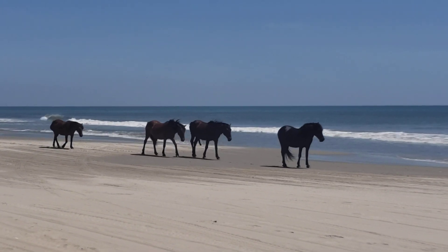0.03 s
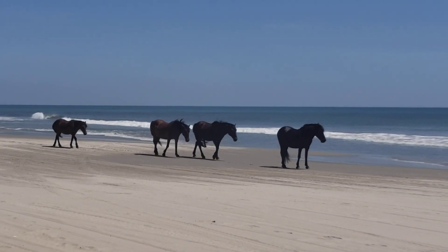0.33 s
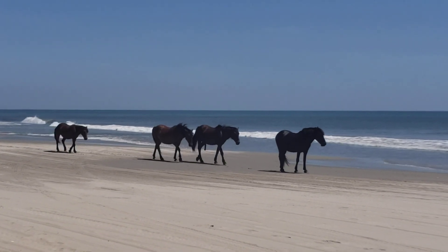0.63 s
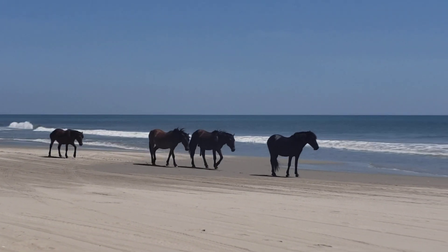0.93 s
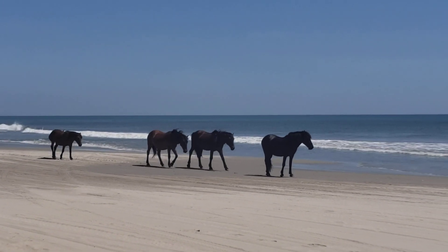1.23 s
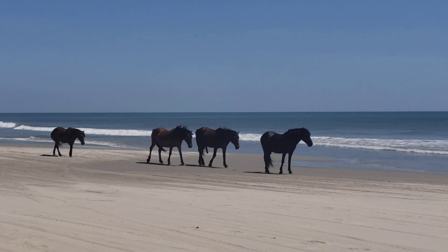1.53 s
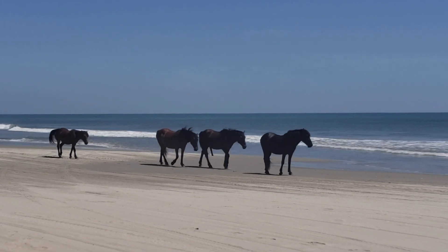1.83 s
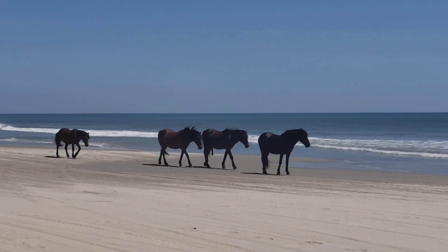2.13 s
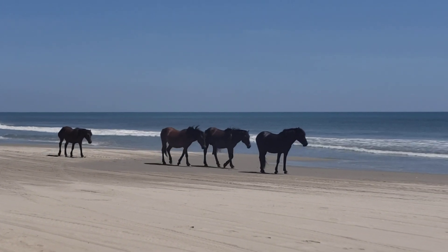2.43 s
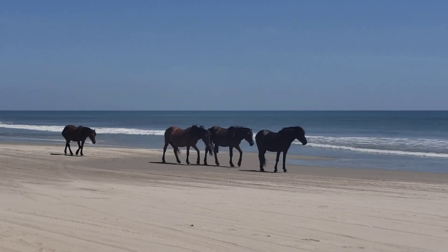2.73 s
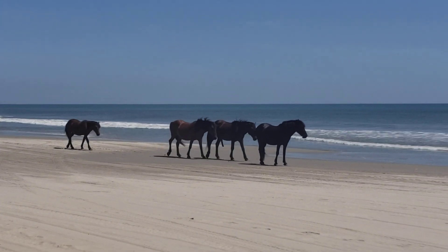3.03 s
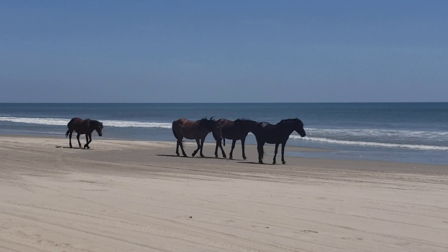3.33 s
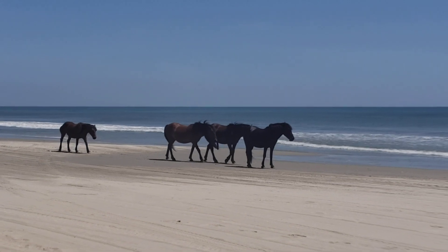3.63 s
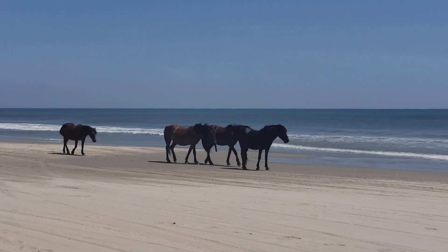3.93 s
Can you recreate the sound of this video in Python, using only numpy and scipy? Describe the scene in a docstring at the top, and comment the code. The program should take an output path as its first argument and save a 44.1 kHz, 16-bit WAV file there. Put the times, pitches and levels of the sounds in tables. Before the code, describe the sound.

Wind buffets the microphone on an open beach. For the first half second a strong gust booms on the right and hisses on the left. It then drops to quick, irregular low thumps that continue until the end at 4 seconds. Surf washes behind throughout, swelling slightly after 3 seconds. Faint sand ticks come near 2.2 and 3.5 seconds, and a faint bright hiss rises on the left late.

```python
"""A strong gust batters the right of two small microphone ports and hisses across the left.
Behind it is the surf of an open beach: breakers wash in from the right, swell slowly and fizz with foam.
The gust drops away after half a second, but eddies keep thumping on the ports in quick flurries.
Later, sand ticks faintly on the case, and a brighter hiss rises on the left near the end."""
import sys
import numpy as np
from scipy import signal
from scipy.fft import rfft, irfft
from scipy.io import wavfile
from scipy.ndimage import uniform_filter1d

SR = 44100
rng = np.random.default_rng(int(sys.argv[2]) if len(sys.argv) > 2 else 0)


def generate_wav(signal):
    """Clip the signal to [-1, 1] and save it as 16-bit WAV at the path in sys.argv[1]."""
    frames = np.transpose(np.atleast_2d(signal))
    scaled = np.clip(frames, -1, 1) * 32767
    pcm = np.round(scaled).astype(np.int16)
    wavfile.write(sys.argv[1], SR, pcm)


N = 176400
TIME, FREQS = np.arange(N) / SR, np.fft.rfftfreq(N, 1 / SR)

# The wind's fader ride. Each row: time in seconds, level in dB before each port's own gain.
WIND_RIDE = [(0.0, -36), (0.04, -33.5), (0.5, -29.5), (0.6, -33), (0.75, -34.5), (1.0, -41), (1.14, -34),
             (1.19, -35.5), (1.23, -34), (1.33, -41), (1.74, -41), (1.79, -33), (1.85, -37), (1.98, -43),
             (2.1, -36.5), (2.19, -35.5), (2.28, -40), (2.5, -41), (2.55, -42.5), (2.8, -37), (3.0, -38.5),
             (3.15, -42), (3.36, -37), (3.57, -40), (3.65, -34.5), (3.75, -32), (3.89, -42), (3.94, -37),
             (4.0, -30.5)]
# Four wind tone curves. Each row: frequency in Hz, relative level in dB.
EDDY_EQ = [(15, -30.5), (30, -13.5), (48, -4.5), (66, 2.5), (110, -7.5), (180, -7), (280, -13.5),
           (450, -26), (900, -39.5), (3000, -76)]  # the pressure kick of an eddy
RASP_EQ = [(500, -9), (1100, -4.5), (1750, 1), (2400, -1), (3300, -3.5), (4000, -8.5), (4800, -21),
           (6200, -17), (8500, -36), (12000, -67)]  # air rushing across the left port
BOOM_EQ = [(25, -25), (50, -7.5), (73, 2.5), (105, -3.5), (200, -31), (800, -80)]  # deep buffeting of the right port
FLUTTER_EQ = [(60, -16.5), (130, 0.5), (310, -0.5), (450, -11), (1000, -26), (3000, -60)]  # the small eddies that a large one sheds
# Lulls between gusts. Each row: centre in seconds, spread in seconds, dip of the wind in dB.
WIND_LULLS = [(0.586, 0.015, -3.5), (1.06, 0.011, -3), (1.548, .025, -4), (1.89, 0.036, -6),
              (2.078, 0.02, -6.5), (3.428, .018, -5.5), (3.796, 0.03, -7)]
# The swell of the breakers. Each row: time in seconds, then roar, wash and foam gains in dB.
SURF_SWELL = [(0, -1, 1, 2.5), (.6, -2.6, -1, 0), (.82, -1.5, -1.1, 0), (.97, -1.5, 0, 1.3),
              (1.12, -4.5, -1.8, 0.5), (1.35, 0, -1.4, 1), (1.6, -1, -2.5, -1), (1.8, 0, -1, -0.1),
              (2.0, -2, -3, -0.9), (2.2, 0, -1.2, -0.9), (2.38, 3, -1, -0.9), (2.6, -1.3, 0, -1),
              (2.8, 1.5, 0.1, -0.5), (3.02, 0.5, -0.5, 0), (3.15, .8, 1.5, 0.5), (3.35, 1.9, 1.5, 1.5),
              (3.48, 3, 3, 3), (3.58, 0.5, -0.5, 1.5), (3.7, 0.5, 1.8, 3.5), (3.87, 3, 1, 2.5),
              (4.0, 1.5, 1.5, 3)]
# The surf's tone at the ports. Each row: frequency in Hz, left and right base levels in dB per Hz.
SURF_EQ = [(29.8, -112, -113), (119, -62, -63), (208, -67.5, -70.5), (300, -69.5, -65.5),
           (446, -69.5, -70.5), (576, -74, -74.5), (793, -73, -74.5), (972, -79, -81), (1336, -74.5, -76),
           (1970, -80, -82.5), (2260, -78.5, -79.5), (2900, -82, -83), (3450, -86, -89.5),
           (3950, -90.5, -92), (5100, -94, -93), (6100, -94.5, -95.5), (7350, -98.5, -99),
           (8280, -104, -105), (11100, -107, -104), (11900, -119, -102), (14500, -120, -102),
           (14600, -120, -112)]
# How the sea reaches the ports. Each row: frequency in Hz, right lead in radians, likeness from 0 to 1.
SURF_STEREO = [(98, 0.15, 1), (467, 0.31, 0.29), (813, 0.97, 0.71), (1300, 2.9, 0.62), (1810, 4.15, 0.72),
               (2470, 6.7, 0.22), (3360, 9, 0.32), (4000, 12.3, 0.96), (4180, 11, 0.2), (5750, 17, 0.4),
               (7240, 19.2, 0.1), (14000, 29, 0.06)]
# The drift of the surf's tone. Each row: frequency in Hz, late level minus early level in dB.
SURF_DRIFT = [(450, -0.5), (570, 2.5), (730, -0.5), (930, 2.5), (1250, 0), (1700, 0), (2400, 0.7),
              (3350, -0.3), (4000, 0.5), (4900, -2.5), (5700, -1), (6500, 2.5), (8200, 0.5), (10500, 2),
              (14000, 1)]
# Large eddies. Each row: centre in seconds, left and right base levels in dB, pitch in Hz before sag.
LARGE_EDDIES = [(0.051, -37, -28, 100), (0.099, -27, -24, 74), (0.177, -35, -20.5, 107),
                (0.22, -22, -16, 80), (0.281, -25.5, -22, 85), (0.315, -37, -19, 114), (0.37, -29, -22, 80),
                (0.413, -23.5, -17, 287), (0.46, -20.5, -16, 117), (0.508, -22.5, -20.5, 110),
                (0.613, -21, -28, 83), (0.663, -31, -19, 136), (0.716, -27, -21, 85),
                (0.777, -20.5, -23.5, 97), (0.809, -30, -32, 118), (0.845, -23, -20.5, 91),
                (0.911, -26, -25.5, 89), (0.966, -27, -26, 114), (0.993, -26.5, -32, 132),
                (1.031, -25.5, -24, 110), (1.097, -23, -21, 127), (1.141, -22.5, -23, 84),
                (1.226, -22, -24, 92), (1.271, -24, -27.5, 132), (1.318, -26, -32, 113),
                (1.465, -26, -24, 288), (1.502, -24, -26.5, 101), (1.685, -22, -22.5, 143),
                (1.786, -22.5, -18.5, 77), (1.808, -28, -24.5, 75), (1.838, -26.5, -22, 124),
                (1.942, -26.5, -27, 125), (1.974, -25, -28, 150), (1.992, -25, -30, 94),
                (2.163, -32, -24, 123), (2.19, -26, -25, 90), (2.21, -23, -24.5, 98), (2.25, -37, -25, 106),
                (2.34, -24, -29, 137), (2.371, -25, -22, 193), (2.447, -22.5, -24.5, 108),
                (2.491, -23.5, -24, 86), (2.626, -22, -27, 192), (2.669, -26, -39, 140),
                (2.739, -23, -25.5, 113), (2.801, -21, -19, 108), (2.868, -27.5, -34, 88),
                (2.936, -23.5, -24.5, 99), (2.982, -23, -24.5, 106), (3.018, -23.5, -24.5, 95),
                (3.068, -21, -27, 132), (3.149, -26.5, -25, 138), (3.218, -24.5, -28.5, 110),
                (3.281, -20.5, -22, 129), (3.342, -20.5, -22, 103), (3.372, -21.5, -22, 113),
                (3.499, -23, -22, 122), (3.627, -24, -20.5, 96), (3.663, -29, -21, 88),
                (3.726, -34, -28, 107), (3.884, -20.5, -30, 156), (3.99, -20.5, -20.5, 154)]
# Air whistling over the ports. Each row: centre and spread in seconds, pitch and half-width in Hz,
# left and right levels in dB.
PORT_WHISTLES = [(.1, .025, 14300, 1500, -85, -61), (.26, .022, 1740, 50, -44, -60),
                 (.25, .018, 2570, 70, -45, -60)]
# Sand hitting the case. Each row: start in seconds, left and right gains in dB.
SAND_HITS = [(2.153, -53, -55), (3.526, -51, -64), (3.563, -53, -64)]
# Two bright tone curves. Each row: frequency in Hz, relative level in dB.
SAND_EQ = [(3000, -20), (7000, -10), (9200, 5), (11000, 1), (15000, -8)]  # a grain on the case
LATE_HISS_EQ = [(4000, -12), (6000, 8), (8500, -5), (10700, 9), (12000, -15), (15500, -25)]  # the hiss near the end

GUST_HOLD_S = 0.534


def undb(db):
    """Decibels to gain."""
    return 10 ** (np.asarray(db) / 20)


def unit(x):
    """Scale to rms 1."""
    return x / np.sqrt(np.mean(x ** 2))


def ramp(start_s, length_s):
    """A straight fade from 0 to 1."""
    return np.clip((TIME - start_s) / length_s, 0, 1)


def bell(x):
    """Gaussian bump of height 1 and spread 1."""
    return np.exp(-.5 * np.minimum(abs(x), 10) ** 2)


def curve(table, column=1):
    """One column of a time table, at every sample."""
    rows = np.array(table)
    return np.interp(TIME, rows[:, 0], rows[:, column])


def by_pitch(table, column=1):
    """One column of a frequency table, at every bin."""
    rows = np.array(table)
    return np.interp(np.log(FREQS + 1), np.log(rows[:, 0]), rows[:, column])


def colour(x, eq):
    """Apply a tone curve as a minimum-phase filter, so attacks stay clean."""
    cepstrum = irfft(np.log(undb(by_pitch(eq))), N)
    cepstrum[1:N // 2] *= 2
    cepstrum[N // 2 + 1:] = 0
    return irfft(rfft(x) * np.exp(rfft(cepstrum)), N)


def noise(eq):
    """Coloured noise of rms 1."""
    return unit(colour(rng.standard_normal(N), eq))


def wander(hz):
    """Smooth random motion of spread 1, mostly slower than hz."""
    return unit(irfft(rfft(rng.standard_normal(N)) * (FREQS > 1) / (1 + (FREQS / hz) ** 2) ** 2, N))


def level_out(x, window_s):
    """Hold the running rms near 1, with the channels linked."""
    power, span = np.mean(np.atleast_2d(x) ** 2, axis=0), int(window_s * SR)
    return x / np.sqrt(uniform_filter1d(uniform_filter1d(power, span), span))


def eddies(per_second):
    """Pressure kicks of random size and sign, each a low thump; equally loud at any rate."""
    hits = rng.random(N) < per_second / SR
    sizes = np.sign(rng.standard_normal(N)) * undb(3 * rng.standard_normal(N))
    return unit(colour(hits * sizes / np.sqrt(per_second), EDDY_EQ))


def gust_rasp():
    """Air rushing across a port: a hiss with a slight, fast tremble."""
    return undb(-41 + 0.5 * wander(hz=110)) * noise(RASP_EQ)


def gust_boom():
    """The strong gust buffets a port: a deep, even rumble that holds, then fades."""
    envelope = 1 - ramp(GUST_HOLD_S, length_s=0.17)
    return undb(-27) * envelope * level_out(noise(BOOM_EQ), window_s=.02)


def wind():
    """Eddies strike the ports, some both at once; the strong gust rasps left and booms right."""
    gust = 1 - ramp(GUST_HOLD_S, length_s=0.032)
    per_second = 200 + 780 * gust
    shared_power = 0.12
    centre = np.sqrt(shared_power) * eddies(per_second)
    sides = np.sqrt(1 - shared_power) * np.array([eddies(per_second), eddies(per_second)])
    flow = level_out(centre + sides, window_s=0.034)  # evened out, so the ride shapes the flurries
    port_db = np.array([np.full(N, 0.9), 0.4 + 4.5 * gust])
    left_only = gust * gust_rasp() + undb(-41) * eddies(per_second)  # a steady bed outlasts the rasp
    return flow * undb(curve(WIND_RIDE) + port_db) + np.array([left_only, gust_boom()])


def sea_bed():
    """The stereo spectrum of steady surf; the right port hears it first."""
    common, diffuse = rfft(rng.standard_normal((2, N))) * np.sqrt(SR / 2)
    lag, likeness = by_pitch(SURF_STEREO, 1), by_pitch(SURF_STEREO, 2)
    left = likeness * common * np.exp(-1j * lag) + np.sqrt(1 - likeness ** 2) * diffuse
    return np.array([left * undb(by_pitch(SURF_EQ, 1)), common * undb(by_pitch(SURF_EQ, 2))])


def surf():
    """Roar, wash and foam swell separately; their half-octave bands churn together and flicker alone."""
    sea = sea_bed()
    roar_db, wash_db, foam_db = (curve(SURF_SWELL, column) for column in (1, 2, 3))
    churn_db, tumble_db = 0.82 * wander(hz=69), 1.07 * wander(hz=55.6)
    edges_hz = [0] + list(125 * 2 ** (np.arange(16) / 2))
    out = 0
    for low, high in zip(edges_hz, edges_hz[1:]):
        band = irfft(sea * ((FREQS >= low) & (FREQS < high)), N)
        swell_db = roar_db if low < 990 else wash_db if low < 3900 else foam_db
        unrest_db = churn_db + 1.41 * wander(hz=51)
        if swell_db is foam_db:  # fine foam is calmer
            unrest_db *= .55
        if high < 510:  # the low roar tumbles more than the rest
            unrest_db += tumble_db
        out += band * undb(swell_db + unrest_db)
    return out


def drift_tone(sea):
    """Crossfade the surf from its early tone to its late one."""
    half_db = by_pitch(SURF_DRIFT) / 2
    early, late = (irfft(rfft(sea) * undb(db), N) for db in (-half_db, half_db))
    blend = ramp(start_s=1.6, length_s=0.79)
    return early * (1 - blend) + late * blend


def swing(cycles, phase, spread):
    """One swing of pressure: a cosine under a bell, with phase and spread in cycles."""
    return bell(cycles / spread) * np.cos(2 * np.pi * (cycles + phase))


def thumps():
    """Each large eddy is a steep-flanked swing, a little apart at the two ports, and sheds a flutter."""
    pitch_sag, flank_ratio = 0.84, 2.41
    skew_s = 0.00053 * np.array([[1], [-1]])
    small_eddies = np.array([noise(FLUTTER_EQ), noise(FLUTTER_EQ)])
    out = 0
    for when, left, right, hz in LARGE_EDDIES:
        phase, side = rng.standard_normal(2)
        cycles = (TIME - when + side * skew_s) * hz * pitch_sag
        body = undb(-3) * swing(cycles, phase, spread=0.44)
        flank = undb(-10.5) * swing(cycles * flank_ratio, phase, spread=0.43)
        flutter = undb(-13) * bell((TIME - when) / 0.0071) * small_eddies
        out += undb([[left], [right]]) * (body + flank + flutter)
    return out


def whistles():
    """Air whistles over the ports in the strong gust: brief puffs of narrow-band noise."""
    out = 0
    for when, spread_s, hz, width_hz, left, right in PORT_WHISTLES:
        band = np.exp(-((FREQS - hz) / width_hz) ** 2)
        tone = unit(irfft(rfft(rng.standard_normal(N)) * band, N))
        out += undb([[left], [right]]) * tone * bell((TIME - when) / spread_s)
    return out


def sand_ticks(decay_s=.0018):
    """Blown sand taps the case: tiny bright cracks that die at once."""
    crack, out = noise(SAND_EQ) / 2, 0
    for start, left, right in SAND_HITS:
        envelope = (TIME >= start) * np.exp(-abs(TIME - start) / decay_s)
        out += undb([[left], [right]]) * crack * envelope
    return out


def late_hiss():
    """A faint, bright hiss fades in, hard left."""
    left = undb(-64.5) * ramp(start_s=3.23, length_s=.35) * noise(LATE_HISS_EQ)
    return np.array([left, np.zeros(N)])


def scene():
    """Mix sea and wind with the details on top; the lulls duck the wind fully and the surf lightly."""
    lull_db = sum(db * bell((TIME - when) / spread_s) for when, spread_s, db in WIND_LULLS)
    sea = drift_tone(surf()) * undb(0.37 * lull_db)
    air = wind() * undb(lull_db)
    return sea + air + thumps() + late_hiss() + whistles() + sand_ticks()


def record(dry):
    """Soften both ends with a short fade and cut the very top steeply."""
    fade_s, top_hz = .004, 15700
    fade = np.clip(np.minimum(TIME, TIME[-1] - TIME) / fade_s, 0, 1)
    return signal.sosfilt(signal.ellip(10, .2, 80, top_hz, fs=SR, output="sos"), dry * fade)


dry = scene()
out = record(dry)
generate_wav(out)
```